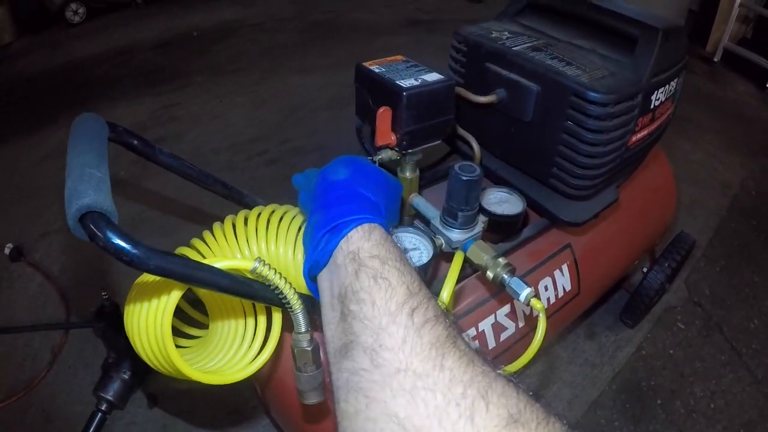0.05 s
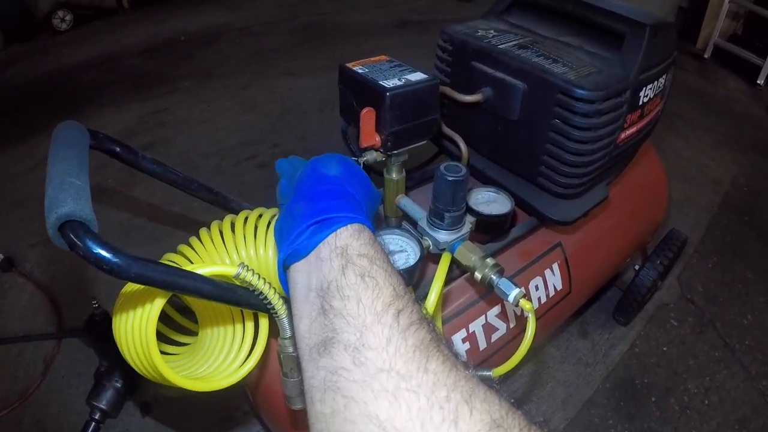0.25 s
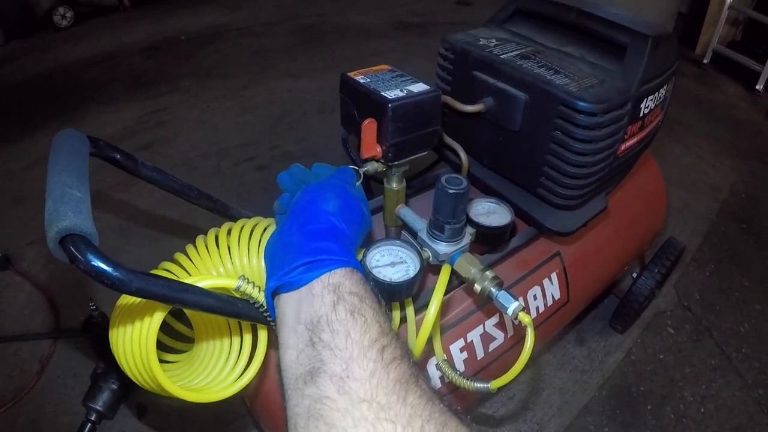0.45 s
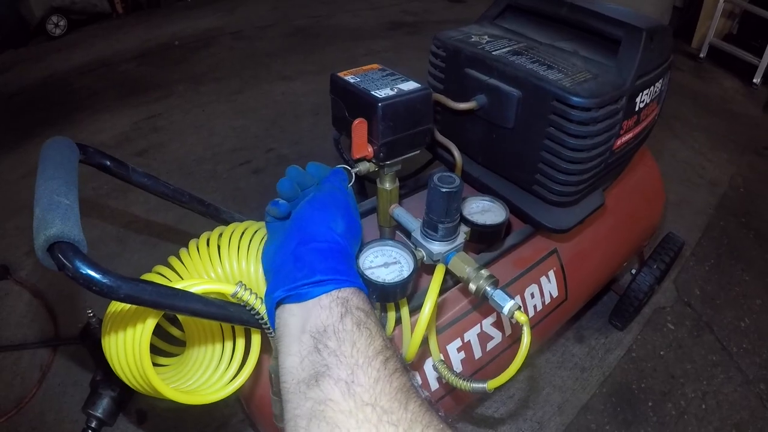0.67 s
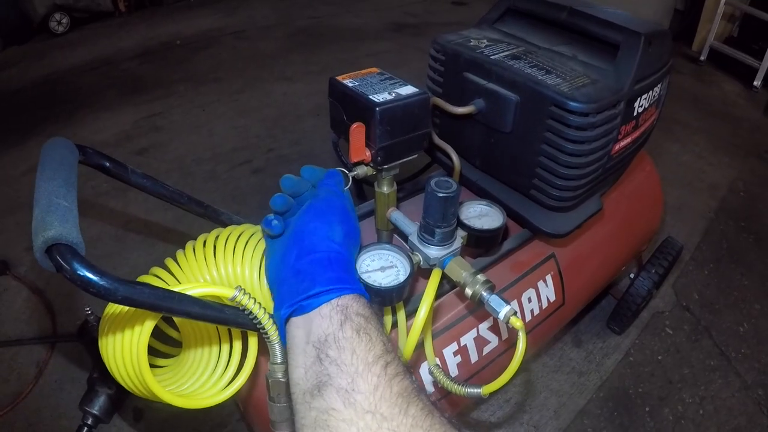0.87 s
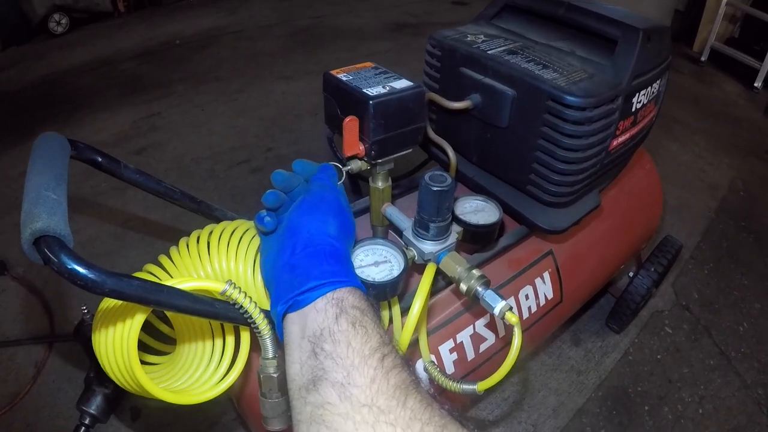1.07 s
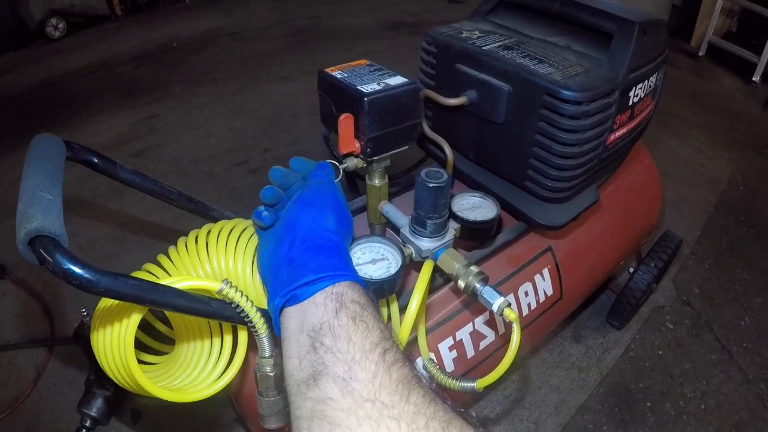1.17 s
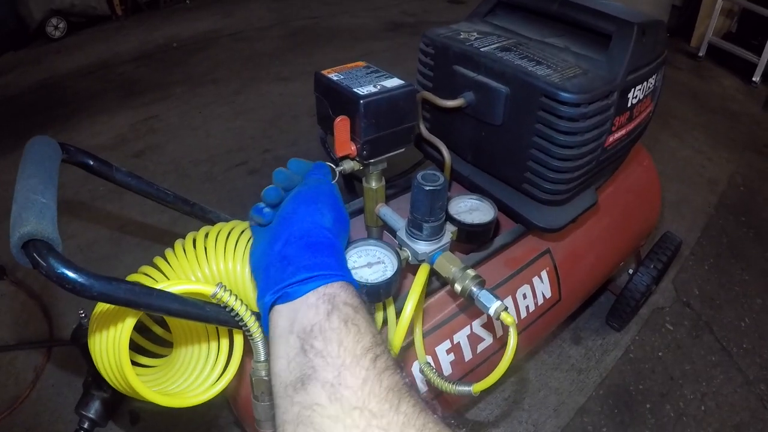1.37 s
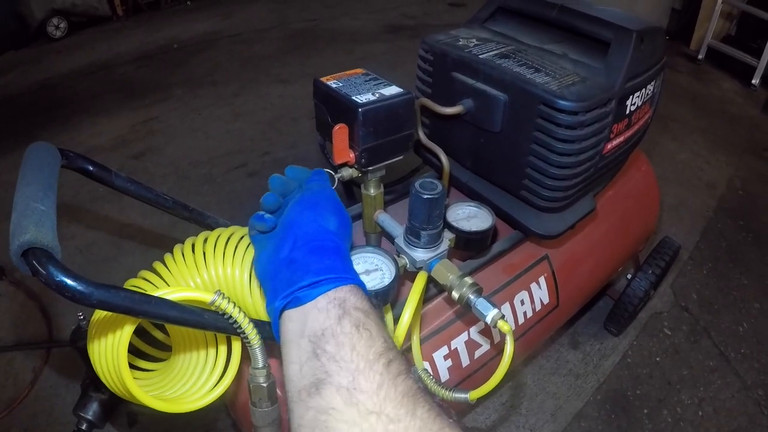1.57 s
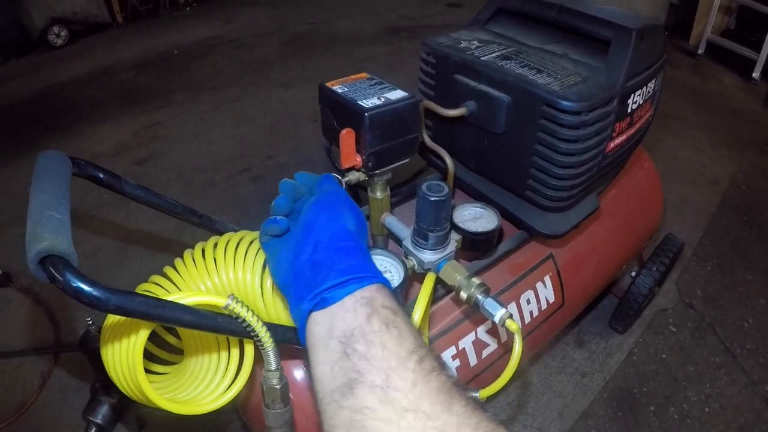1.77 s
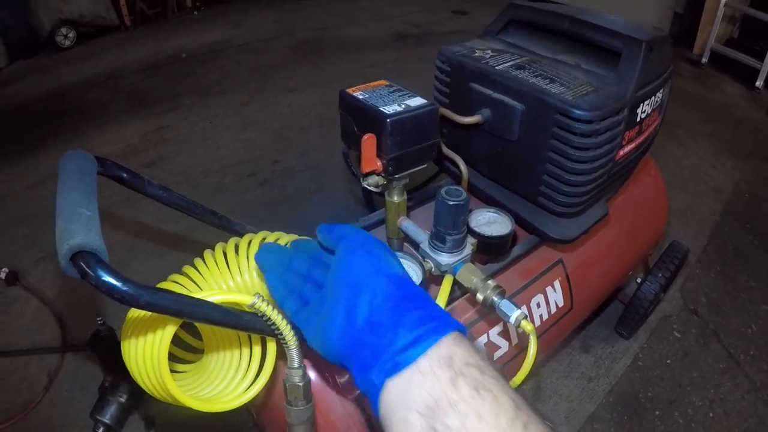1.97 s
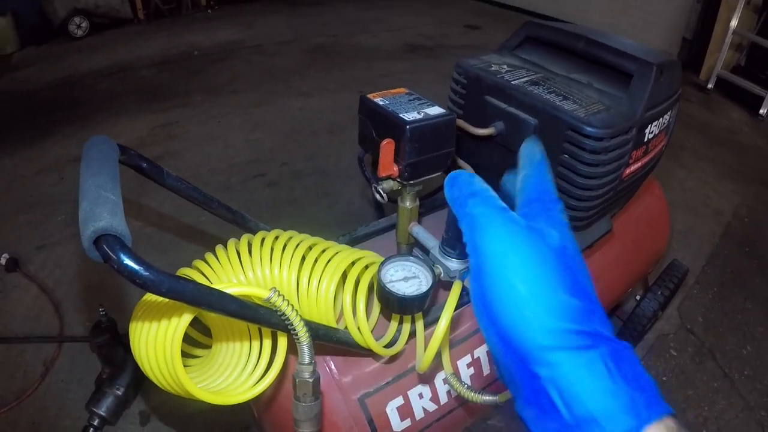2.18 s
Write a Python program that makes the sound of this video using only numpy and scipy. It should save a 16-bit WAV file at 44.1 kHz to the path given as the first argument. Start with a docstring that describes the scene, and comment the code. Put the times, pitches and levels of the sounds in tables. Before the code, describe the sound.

Compressed air blasts from a tank relief valve, close and wide in stereo: a steady, harsh, bright hiss from the start, slightly fluttering, opening up in colour around 0.4 s. It dies quickly at 1.2-1.3 s, pops back with a low thump at 1.38 s, sags briefly near 1.63 s, swells, then shuts off by 1.87 s. A garage reverb tail fades over faint low air buffeting and room rumble.

```python
"""Relief valve of an air compressor

A hand pulls the valve ring of a tank in a garage, close to a pair of microphone ports.
The jet, shaped noise in flickering bands, hisses, dies as the valve closes, pops open, sags once and shuts off.
Band-passed impulses make the thumps; decaying noise, as an impulse response, makes the garage ring.
Low noise makes the stirred air on the ports and the rumble of the room."""
import sys
import numpy as np
from scipy import signal
from scipy.fft import rfft, irfft
from scipy.io import wavfile

SR = 44100
rng = np.random.default_rng(int(sys.argv[2]) if len(sys.argv) > 2 else 0)


def dump(signal):
    """Clip the signal to [-1, 1] and save it as 16-bit WAV at the path in sys.argv[1]."""
    limited = np.clip(np.atleast_2d(signal).T, -1, 1)
    pcm = np.round(limited * 32767).astype(np.int16)
    wavfile.write(sys.argv[1], SR, pcm)


N = 98254


def undb(db):
    """Level: an amplitude ratio is ten to the power of dB / 20."""
    return 10 ** (np.asarray(db) / 20)


def times():
    """Sampling: the time of every sample [s]."""
    return np.arange(N) / SR


def freqs():
    """Fourier analysis: the frequency of every bin [Hz], at least 1."""
    return np.maximum(np.arange(N // 2 + 1) * SR / N, 1)


def curve(table):
    """Linear interpolation: a (time [s], value) table read at every sample."""
    return np.interp(times(), *np.array(table).T)


def at_hz(table, hz, order=1):
    """Logarithmic pitch scale: one column of a table, interpolated over log frequency."""
    rows = np.array(table)
    return np.interp(np.log(hz), np.log(rows[:, 0]), rows[:, order])


def noise():
    """Statistical independence: two unrelated white noises."""
    return rng.standard_normal((2, N))


def colour(x, table):
    """Spectral shaping: a (frequency [Hz], level [dB]) filter under which white noise keeps its power."""
    gain = undb(at_hz(table, freqs()))
    unit_power_gain = gain / np.sqrt(np.mean(gain ** 2))
    return irfft(rfft(x) * unit_power_gain, N)


def bands(x, count=24):
    """Superposition: overlapping bands that add up to the whole; yields (centre [Hz], band)."""
    centres = np.geomspace(100, 16000, count)
    spectrum = rfft(x)
    for hz, pick in zip(centres, np.eye(count)):
        triangle = np.interp(np.log(freqs()), np.log(centres), pick)
        yield hz, irfft(spectrum * triangle, N)


def walk(rate):
    """Low-passed randomness: smooth chance of spread 1, changing about rate times a second."""
    lowpass = 1 / (1 + (2 * freqs() / rate) ** 4)
    x = irfft(rfft(rng.standard_normal(N)) * lowpass, N)
    return (x - x.mean()) / x.std()


def ports(pair, balance_db, lead, likeness, size=512):
    """Coherence: a shared and an opposed part of two unrelated signals set balance, phase and likeness."""
    c, ratio = np.clip(likeness, 0, 1), undb(balance_db)
    shared = np.sqrt((1 + c) / (1 + ratio ** 2))
    opposed = np.sqrt((1 - c) / (1 + ratio ** 2))
    left = ratio * np.exp(1j * lead)
    response = irfft(np.array([[left * shared, left * opposed], [shared, -opposed]]), N)
    # centre the responses and window them to short filters
    taps = np.roll(response, size, axis=2)[..., :2 * size + 1] * np.hanning(2 * size + 1)
    return signal.fftconvolve(pair[None], taps, axes=2).sum(axis=1)[:, size:size + N]


def jet():
    """Turbulent jet noise: valve opening sets level and brightness, eddies flutter, the hand colours."""
    # strength of the jet as the valve is worked: (time [s], relative level [dB])
    valve = [(0, -1), (.33, -1.4), (.55, -0.44), (.75, -0.9), (1.05, 0.25), (1.2, -0.5), (1.24, -3.5),
             (1.275, -10.5), (1.31, -29), (1.381, -38), (1.384, 0), (1.52, .2), (1.575, -2), (1.61, -6.5),
             (1.628, -10), (1.645, -2.5), (1.68, 1), (1.77, -0.5), (1.818, -3), (1.84, -10), (1.87, -23),
             (1.95, -100)]
    # spectrum of the open jet: (frequency [Hz], relative density [dB per Hz])
    open_jet = [(60, -36.5), (115, -31.5), (165, -19.5), (330, -15), (600, -11), (1150, -5), (2100, -9.5),
                (2600, -8.5), (3200, -5.5), (4050, -6.5), (4550, -7), (5300, -3), (6400, 0.97), (7200, -1),
                (7700, -1), (8200, -6.5), (9800, -6), (10900, -11.5), (12200, -8.5), (13500, -11),
                (15000, -15.5)]
    # how far the hand covers the vent: (time [s], share [0-1])
    hand = [(0, 0.98), (.36, 1), (.5, 0.4), (.75, 0.48), (.95, 0.02), (1.2, 0.3), (1.4, 0.75), (1.8, 0.3)]
    # change of colour under full cover: (frequency [Hz], gain [dB])
    hand_colour = [(200, 1.5), (1200, -1.5), (2200, -2.5), (3600, 0.4), (5400, -1.2), (7200, -1.5),
                   (9000, 3.5), (11000, 3.6), (15000, 0)]
    # a weak jet is duller: extra dB per dB of strength for each octave above choke_hz
    choke_tilt, choke_hz = .09, 3000
    flutter_db, flutter_rate = 0.31, 16  # whole jet, rate per second; tilted with the strength
    flicker_db, flicker_rate = 0.65, 35  # single bands, rate per second
    sputter_db, sputter_rate = 0.36, 340  # fine eddies, rate per second

    strength_db = curve(valve) + flutter_db * walk(flutter_rate)
    cover = curve(hand)
    sputter = undb(sputter_db * walk(sputter_rate))
    eddies = colour(noise() * sputter, open_jet)
    out = 0
    for hz, band in bands(eddies):
        octaves = np.log2(hz / choke_hz)
        jet_db = strength_db * (1 + choke_tilt * octaves)
        hand_db = cover * at_hz(hand_colour, hz)
        flicker = flicker_db * walk(flicker_rate)
        out = out + band * undb(jet_db + hand_db + flicker)
    return out


def jet_at_ports(air):
    """Near-field reception: level, phase and coherence between the ports depend on frequency."""
    # (frequency [Hz], left minus right [dB], lead of the left [rad], likeness [0-1])
    port_pair = [(150.0, -3, -0.26, 0.98), (300.0, -4, 1.2, 1.0), (516, -9, 0.68, 1.0),
                 (900.0, 0.1, 1.28, 1.0), (1520, 5.5, 1.04, 1), (2010, 2.0, 0.28, 0.66),
                 (2500.0, 0, 0.18, 1.0), (5100, 0.0, 0.73, 1.0), (5770, -1, -0.73, 0.57),
                 (6770, -9.5, 3, 0.54), (6670, 6.5, 1.95, 0.45), (8440, 0.5, 1.26, 0.5),
                 (10100, 3, 1.8, 0.44), (12500.0, 14, 1.4, 0.2), (15000.0, 9, -0.095, 0.07)]
    f = freqs()
    balance_db = at_hz(port_pair, f)
    lead = at_hz(port_pair, f, order=2)
    likeness = at_hz(port_pair, f, order=3)
    return ports(air, balance_db, lead, likeness)


def thumps():
    """Impulse response: each snap of the valve sends out a puff of pressure that swings briefly."""
    # the valve seats or pops open: (time [s], peak level [dB])
    snaps = [(1.281, -37), (1.384, -22), (1.832, -39)]
    low_hz, high_hz = 130, 330
    body = signal.butter(2, [low_hz, high_hz], "band", fs=SR, output="sos")
    puff = signal.sosfilt(body, signal.unit_impulse(N) + 1e-18)
    puff = puff / np.abs(puff).max()
    return sum(undb(db) * np.interp(times() - start, times(), puff, left=0) for start, db in snaps)


def garage(x):
    """Reverberation: a dense exponential decay, set band by band, fades fastest in the treble."""
    # (frequency [Hz], colour [dB], time to fall 60 dB [s], left minus right [dB], likeness [0-1])
    room = [(150, 1, 1.4, -4, .9), (500, 3, 1.28, -9.5, .7), (1140, -.5, 1.36, -1.5, 0),
            (2250, 0.5, 1.6, 0.5, 0.63), (4280, -1.1, 1.18, -0.5, 0.74), (5800, 0.5, 1.38, -3.5, 0),
            (9000, 1, 0.77, -1, 0), (12500, -5, 0.57, 5, .05), (15000, -5, .5, 7, .05)]
    delay_s = .008
    age = times() - delay_s
    tail = 0
    for hz, band in bands(noise()):
        fall = np.log(1000) / max(at_hz(room, hz, order=2), .05)  # decay rate per second
        decay = (age > 0) * np.exp(-fall * age)
        equal_energy = np.sqrt(2 * fall / SR)  # whatever the decay time
        tail = tail + band * decay * equal_energy * undb(at_hz(room, hz))
    # reversed hiss ahead of the start leaves the room already ringing
    hiss = np.concatenate([x[::-1], x])
    wet = signal.fftconvolve(hiss[None], tail, axes=1)[:, N:2 * N]
    balance_db = at_hz(room, freqs(), order=3)
    likeness = at_hz(room, freqs(), order=4)
    return ports(wet, balance_db, 0, likeness)


def spread(table, width):
    """Sum and difference stereo: coloured noise, its opposed part scaled by width."""
    mid, side = colour(noise(), table)
    return mid + width * side * np.array([[1], [-1]])


def draught():
    """Wind noise: stirred air buffets the ports in random gusts and slowly settles."""
    # air on the ports: (frequency [Hz], relative density [dB per Hz])
    air_spectrum = [(20, -3), (45, -9), (75, -7), (140, -22), (400, -24), (3000, -75)]
    start_db, fade_db_per_s, width = -49, 15, .45
    gust_db, gust_rate = 1, 17  # rate per second
    db = start_db - fade_db_per_s * times() + gust_db * walk(gust_rate)
    return undb(db) * spread(air_spectrum, width)


def rumble():
    """Stationary background noise: the quiet room, strongest in the bass."""
    # (frequency [Hz], relative density [dB per Hz])
    room_spectrum = [(20, 0.5), (45, 0), (90, -19), (165, -7), (260, -22), (600, -32), (6000, -70)]
    level_db, width = -59.5, 0.54
    return undb(level_db) * spread(room_spectrum, width)


def scene():
    """Superposition: direct jet, reverberation, thumps, draught and rumble add as pressures."""
    jet_db, room_db = -16.5, -25
    air = jet()
    near = undb(jet_db) * jet_at_ports(air)
    reverberation = undb(room_db) * garage(air[0])
    return near + reverberation + thumps() + draught() + rumble()


def record(dry):
    """Band limiting: the recorder cuts the top steeply with an elliptic low-pass."""
    top_hz = 15300
    return signal.sosfilt(signal.ellip(10, .2, 80, top_hz, fs=SR, output="sos"), dry)


dry = scene()
out = record(dry)
dump(out)
```